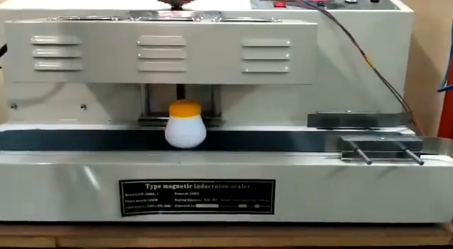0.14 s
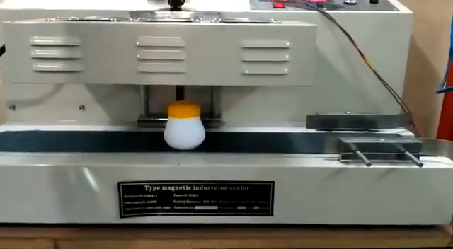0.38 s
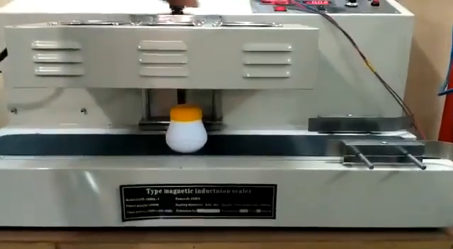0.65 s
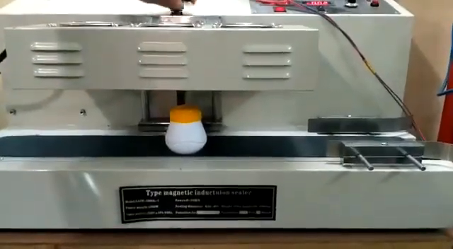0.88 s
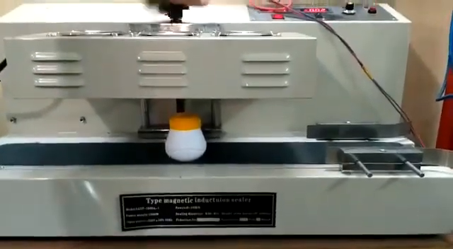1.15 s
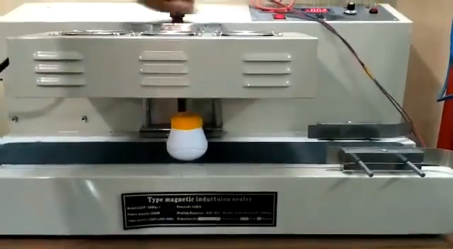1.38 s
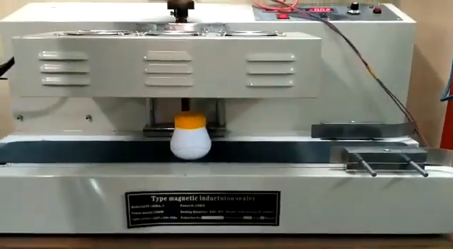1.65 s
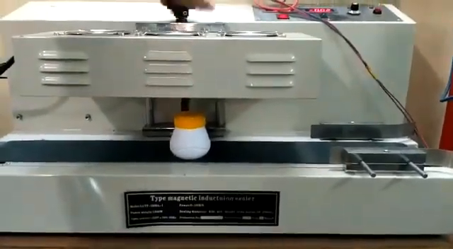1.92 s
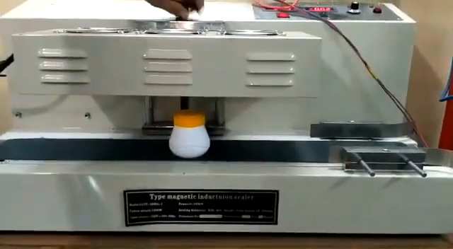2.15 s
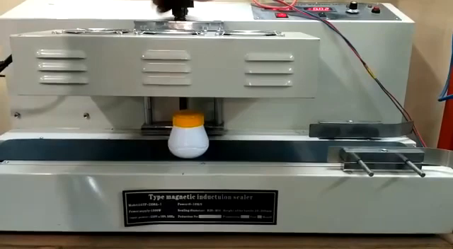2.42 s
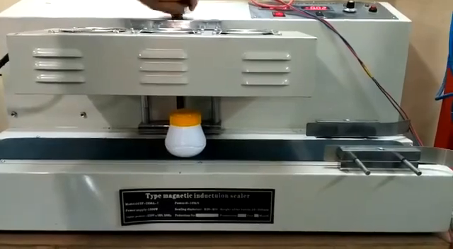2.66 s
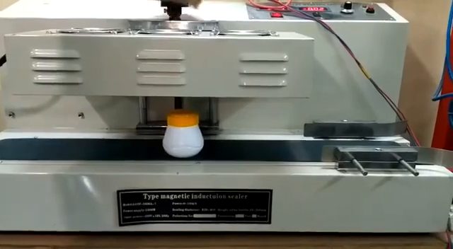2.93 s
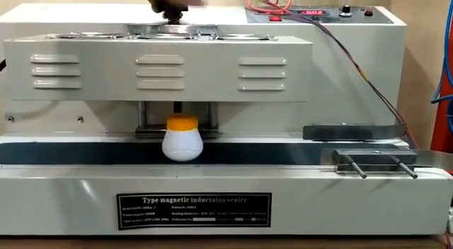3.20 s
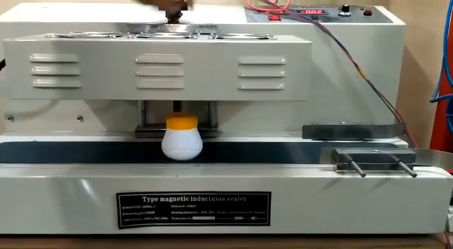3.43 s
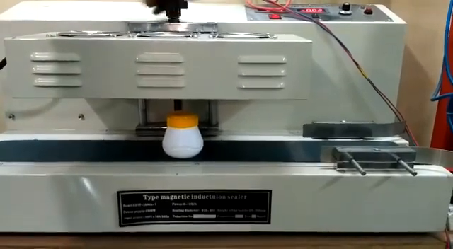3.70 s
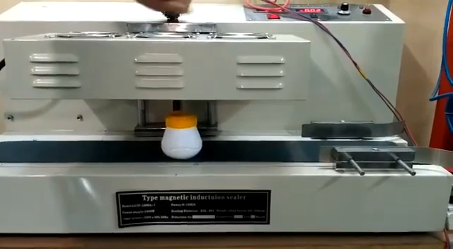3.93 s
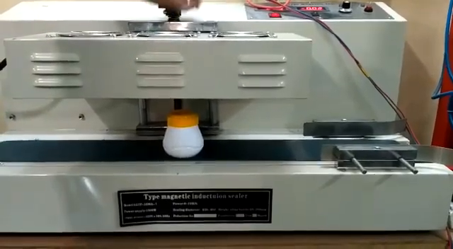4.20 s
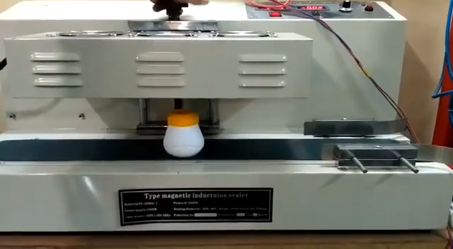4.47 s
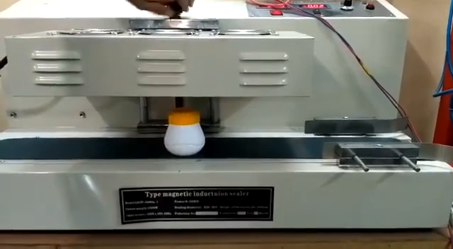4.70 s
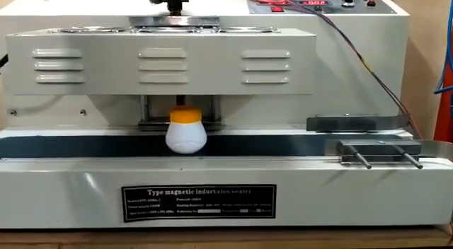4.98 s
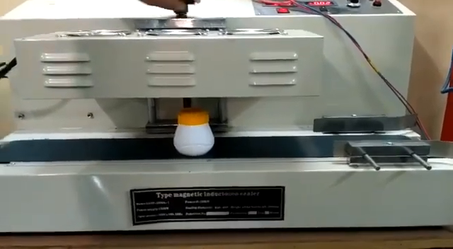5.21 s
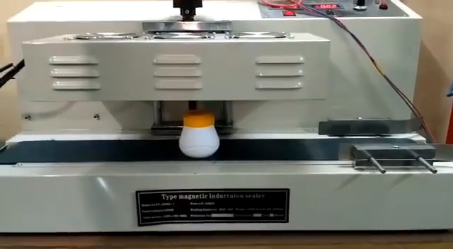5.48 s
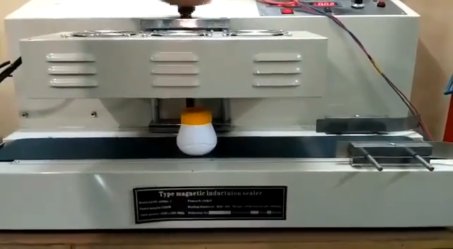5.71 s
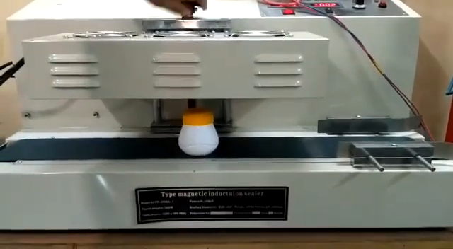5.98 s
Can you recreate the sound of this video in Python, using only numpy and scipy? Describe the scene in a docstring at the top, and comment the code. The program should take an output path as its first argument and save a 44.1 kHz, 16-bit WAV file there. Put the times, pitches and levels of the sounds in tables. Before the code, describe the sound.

Slack crank screw clacks and rattles a metal housing in uneven single knocks, with dull table thumps and short rings, nearly silent in between.

```python
"""Metal clanks: a hand turns the height crank of a sheet-metal tabletop machine in a small room. Slack in the screw
clanks as bursts of contact noise through housing resonances; clear notes ring on as decaying sines.
The frame thuds on the table as low damped sines. A fan hums faintly as shaped noise with narrow hum bands.
The recorder's noise suppressor opens when the level rises and slowly closes again."""
import sys
import numpy as np
from scipy import signal
from scipy.fft import rfft, irfft, next_fast_len
from scipy.io import wavfile
from scipy.ndimage import uniform_filter1d, minimum_filter1d, map_coordinates

SR = 44100
rng = np.random.default_rng(int(sys.argv[2]) if len(sys.argv) > 2 else 0)


def elevation(decibels):
    """Turn decibel levels (scalar or array-like) into linear amplitude ratios."""
    levels = np.asarray(decibels, float)
    return 10 ** (levels / 20)


def put_to_file(sound):
    """Save the sound as 16-bit audio at rate SR, in the file named by the first command-line argument."""
    columns = np.atleast_2d(sound).T  # one column per channel
    safe = np.clip(columns, -1, 1)
    whole_steps = np.round(safe * 32767)
    wavfile.write(sys.argv[1], SR, whole_steps.astype(np.int16))


N = 269451


def unit(x):
    """Scales a signal to rms 1."""
    return x / np.sqrt(np.mean(x ** 2) + 1e-20)


def along(points, hz):
    """Reads a curve of (Hz, value) points on a log frequency axis."""
    f, v = np.transpose(points)
    return np.interp(np.log(hz + 1), np.log(f + 1), v)


def filtered(x, response):
    """Shapes the spectrum of x by a complex response of frequency."""
    m = next_fast_len(x.shape[-1] + 4096)  # spare length for the ringing
    spectrum = rfft(x, m) * response(np.fft.rfftfreq(m, 1 / SR))
    return irfft(spectrum, m)[..., :x.shape[-1]]


def resonance(f, hz, width):
    """One causal resonance of peak gain 1."""
    return 1j * f * width / (hz * hz - f * f + 1j * f * width)


def room(x):
    """A fresh diffuse noise tail in which each frequency dies at its own speed."""
    # reverberation of the small room: f/Hz, t60/s
    decay = [(150, 0.23), (800, 0.35), (3000, 0.29), (12000, 0.38)]
    hz, t, z = signal.stft(rng.standard_normal(len(x)), SR, nperseg=256)
    z = z * elevation(-60 * t / along(decay, hz)[:, None])
    tail = signal.istft(z, SR, nperseg=256)[1]
    return signal.fftconvolve(x, tail / np.linalg.norm(tail))[:len(x)]


def fan():
    """Broadband air noise with a few unsteady hum lines, each a narrow band of noise."""
    # colour of the air noise: f/Hz, relative level/dB
    air_colour = [(18, -52.5), (40, -14), (100, 1), (194, -5), (300, -5), (600, -8.5), (800, -7.5),
                  (1600, -13.5), (4000, -21.5), (6000, -29.5), (9000, -32.5), (13500, -29), (15700, -34),
                  (16200, -68)]
    # hum lines: f/Hz, resonance width/Hz, rms level/dB
    hum_lines = [(95, 3.5, -78.5), (206, 48, -63.5), (298, 3.3, -78), (650.4, 2.3, -72.5),
                 (770, 8.6, -82.5)]
    air = filtered(rng.standard_normal(N), lambda f: elevation(along(air_colour, f)))
    out = elevation(-60) * unit(air)
    for hz, width, db in hum_lines:
        hum = filtered(rng.standard_normal(N), lambda f: resonance(f, hz, width) ** 2)
        out = out + elevation(db) * unit(hum)
    return out


def thuds():
    """Soft pushes set the frame's low modes swinging as damped sines."""
    # pushes on the frame: nominal t/s, relative level/dB, relative level of the upper modes/dB
    pushes = [(0.021, -32.5, -11), (0.133, -40, -23), (0.22, -20.5, -5), (0.267, -23.5, -34),
              (0.31, -16.5, -10.5), (0.4, -28.5, -6.5), (0.631, -52.5, 10.5), (0.782, -29.5, -3.5),
              (1.28, -36.5, 8), (1.532, -34.5, 12), (1.917, -25, -2.5), (2.322, -15.5, -1),
              (2.394, -18, -3), (2.45, -20, 2), (3.189, -40.5, -27.5), (3.291, -30.5, -7.5),
              (3.599, -43, 1), (4.027, -35.5, 1), (4.099, -46, 11.5), (4.423, -27, 0.5), (4.47, -22.5, 0),
              (4.499, -18.5, -0.5), (4.556, -32.5, -24), (4.863, -14, -13), (4.9, -17, -3.5),
              (5.411, -24, 3), (5.479, -26, 5), (5.511, -40.5, 20.5), (5.586, -38, 11.5), (5.783, -30, -8)]
    # modes of the frame on the table: nominal f/Hz, relative level/dB, relative t60
    modes = [(60, -15.5, 1.3), (92.1, -1, 1.1), (126.4, -6, 1.2), (158, 0.5, 0.88), (196.2, 0.5, 1.39),
             (260, -9, 0.69), (337, -7, 0.5), (400, -20, 1.6)]
    t60_s = 0.144  # times the relative t60 of each mode
    out, t = np.zeros(N + SR), np.arange(SR * 2 // 5) / SR
    hz, level_db, lasting = np.transpose(modes)[..., None]
    rise = (1 - np.exp(-t / 0.0051)) ** 2
    for s, db, upper_db in pushes:
        detune = rng.normal(1, 0.02, hz.shape)
        phase = rng.uniform(0, 2 * np.pi, hz.shape)
        mode_db = db - 9 + level_db + (upper_db - 0.5) * (hz > 140)
        size = elevation(mode_db - 60 * t / (t60_s * lasting))
        swings = size * np.sin(2 * np.pi * hz * detune * t + phase)
        thud = rise * np.sum(swings, axis=0)
        out[round((s - .006) * SR):][:len(t)] += thud + elevation(-18.5) * room(thud)
    return out[:N]


def pings():
    """Clear notes, decaying sines: panel rings, some at once, and a few low swells near 195 Hz."""
    # clear notes: t/s, f/Hz, nominal level/dB
    notes = [(.2259, 345, -40.5), (.2525, 845, -55), (.632, 766, -49), (.7787, 758.5, -32),
             (1.268, 745, -47.5), (1.512, 417.4, -25.5), (1.512, 828, -33.5), (1.512, 1664, -34),
             (1.885, 762, -37), (2.3181, 845, -37), (2.3973, 770, -31.5), (3.5901, 2110, -46.5),
             (3.849, 192.7, -60), (3.931, 194.8, -58), (4.029, 923, -42.5), (4.0795, 907, -48),
             (4.4225, 490, -38), (4.425, 2406, -49), (4.602, 194.6, -44), (4.8567, 345, -32.5),
             (5.14, 197, -57), (5.4025, 1085, -37), (5.4119, 410, -39), (5.7671, 845, -43)]
    t60_s, rise_s = 0.22, 0.0071
    drop_s, ring_share = 0.049, .35  # strong at first, then drops to this share and rings on
    out, t = np.zeros(N + SR), np.arange(SR * 2 // 5) / SR
    strength = ring_share + 1 / (1 + (t / drop_s) ** 6)
    shape = elevation(-60 * t / t60_s) * strength * (1 - np.exp(-t / rise_s))
    for s, hz, db in notes:
        ping = elevation(db) * shape * np.sin(2 * np.pi * hz * t)
        out[round(s * SR):][:len(t)] += ping + elevation(-10.0) * room(ping)
    return out[:N]


def contact_noise(t):
    """Metal parts in contact: noise made of uneven contacts that comes in knocks."""
    sizes = elevation(4 * np.clip(rng.standard_normal(len(t)), -2, 2))
    knocks = elevation(2.2 * map_coordinates(rng.standard_normal(100), [200 * t]))  # 200 random levels a second
    return rng.standard_normal(len(t)) * sizes * knocks


def housing():
    """Panel and screw modes over a broad crack; each clank draws slightly different mode levels and tunings."""
    # modes of the housing panels and screw: nominal f/Hz, width/Hz, nominal level/dB
    modes = [(345, 30, -3.5), (410, 3.3, 10.5), (490, 34, 2.5), (570, 90, -6), (631.3, 6.3, -2),
             (733, 24, 5.5), (845, 48, -7), (880, 6, -13.5), (930, 150, -15.5), (1064, 39, 11.5),
             (1430, 240, 8.5), (2110, 570, 10), (2465, 20, -6.5), (2806, 20, -4), (3376, 280, 0),
             (3586, 54, 6.5), (4072, 130, -7.5), (4220, 60, -13.5), (4100, 75, -22), (4600, 150, -20),
             (5300, 170, -4), (5260, 110, -6), (6400, 170, -11), (6767, 200, -8)]
    # colour of the broad crack: f/Hz, relative level/dB
    crack = [(120, -34), (200, 7), (806, 10), (1300, 2), (3900, -10), (5330, -14.5), (5840, -20),
             (6760, -47), (7830, -18.5), (9060, -13.5), (11500, -22), (13000, -15.5), (15200, -18),
             (16000, -40.5)]
    hz, width, level_db = np.transpose(modes)[..., None]
    level_db = level_db + rng.normal(0, 2.2, hz.shape)
    hz = hz * rng.normal(1, .006, hz.shape)
    signs = (-1) ** np.arange(len(hz))[:, None]

    def response(f):
        ringing = np.sum(signs * elevation(level_db) * resonance(f, hz, width), axis=0)
        return ringing + .5 * elevation(along(crack, f) + 10.5)
    return response


def clank(t, db, large_db, contact_hz, drop_ms):
    """A blow and a burst of contact noise that drops off steeply; the contact sets which parts ring most."""
    octaves = np.log2(contact_hz / 3800)  # above the contact of an average clank
    force_db = db + 32  # over an average clank
    small_db = 0.7 * large_db - 5.5 * octaves
    screw_db = -7.5 + 0.36 * large_db - 4.5 * octaves
    sparkle_db = -15 + .05 * force_db + 21 * octaves  # harder clanks are brighter
    blow_db = 3.5 + 0.18 * force_db  # and start more abruptly

    stop = 1 / (1 + (1000 * t / drop_ms) ** 6)
    blow = elevation(blow_db - 60 * t / 0.039)
    swell = elevation(-80 * t) * stop * (1 - np.exp(-t / 0.0056))  # the panels take a moment to get going
    sharp = (elevation(-130 * t) * stop + blow) * (1 - np.exp(-t / 0.0033))
    bright = (elevation(-150 * t) * stop + blow) * (1 - np.exp(-t / 0.0029))  # the treble dies first

    # one band for each envelope: (Hz, dB)
    panels = [(200, -27.5), (300, large_db - 1.5), (620, large_db),
              (720, small_db - 2.5), (1150, small_db), (1400, -23)]
    metal = [(1300, -27.5), (1650, screw_db - 4.0), (2600, screw_db + 3.0), (3100, -9),
             (5500, -6.5), (6000, -3.5), (7500, -17.5), (9000, -53.5)]
    sparkle = [(4000, -55), (6000, sparkle_db + 4.5)]
    colour = housing()

    def response(f):
        nearby = 1 + elevation(5) * resonance(f, contact_hz, .35 * contact_hz)  # louder around the contact
        bands = elevation([along(band, f) for band in (panels, metal, sparkle)])
        return colour(f) * nearby * bands

    bursts = np.array([swell, sharp, bright]) * contact_noise(t)
    return elevation(db - 4.5) * filtered(bursts, response).sum(axis=0)


def clanks():
    """Jerks of the crank: the slack of the screw clanks and rattles the housing."""
    # clanks: nominal t/s, relative level/dB, relative ring of the large panels/dB,
    # centre of the metal contact f/Hz, time until the level drops steeply/ms
    jerks = [(0.2239, -56.5, 18.5, 3400, 115), (0.2532, -41, -11.5, 3000, 130), (.632, -30, -8, 3900, 71),
             (0.7793, -25, -8.5, 4000, 58.5), (1.246, -46.5, 0.5, 3600, 26), (1.268, -41.5, 2, 3880, 122),
             (1.511, -15, -9, 4550, 52), (1.8795, -29.5, -6.5, 4560, 46), (1.894, -32, 2, 4700, 71),
             (2.3005, -49, 8, 4500, 280), (2.318, -19.5, -6, 3940, 61), (2.3965, -10, -8, 3660, 9.3),
             (2.404, -19, -7, 4500, 87), (3.1877, -51, 2, 4200, 48), (3.2957, -40, -5, 4500, 72),
             (3.5899, -36, -8.5, 2460, 69), (4.029, -41.5, -0.5, 2170, 43), (4.0812, -48, -5.5, 1640, 39),
             (4.423, -33.5, -2.5, 4470, 114), (4.817, -51.5, -7.5, 2300, 28.3),
             (4.8561, -16.5, -9, 3890, 61.4), (5.3643, -50, 2, 6400, 47), (5.4023, -32, -1.5, 4640, 52),
             (5.4119, -31, -8, 4900, 133), (5.595, -52.5, 3.5, 3500, 44), (5.7669, -28.5, -6.5, 4440, 70)]
    out, t = np.zeros(N + SR), np.arange(SR * 2 // 5) / SR
    for s, db, large_db, contact_hz, drop_ms in jerks:
        hit = clank(t, db, large_db, contact_hz, drop_ms)
        out[round((s - .0015) * SR):][:len(t)] += hit + elevation(-10.0) * room(hit)
    return out[:N]


def scene():
    """Crank, panels, frame and fan at one microphone."""
    return (clanks() + pings() + thuds() + fan())[None]


def suppressor(x, threshold_db=-50, steepness=3, depth_db=22, closing_db=60, hold_ms=60):
    """Turns down what is below the threshold: opens fast, holds, then closes by closing_db a second."""
    power = np.abs(uniform_filter1d(x ** 2, round(0.01 * SR)))
    level_db = 10 * np.log10(power + 1e-12)
    wanted_db = np.clip(steepness * (level_db - threshold_db), -depth_db, 0)
    hold = round(hold_ms * SR / 1000)
    held_db = -minimum_filter1d(-wanted_db, hold, origin=(hold - 1) // 2)  # highest gain of the hold time
    ramp_db = closing_db * np.arange(len(x)) / SR
    closing_gain_db = np.maximum.accumulate(held_db + ramp_db) - ramp_db
    gain_db = np.maximum(closing_gain_db, -depth_db)
    return x * elevation(uniform_filter1d(gain_db, round(.008 * SR)))


def top_cut(x):
    """Nothing passes above the cut-off."""
    return signal.sosfilt(signal.butter(12, 16820, fs=SR, output="sos"), x)


def record(dry):
    """The recorder's noise suppressor acts on the microphone signal."""
    mix = suppressor(dry[0])[None]
    return top_cut(mix)


dry = scene()
out = record(dry)
put_to_file(out)
```